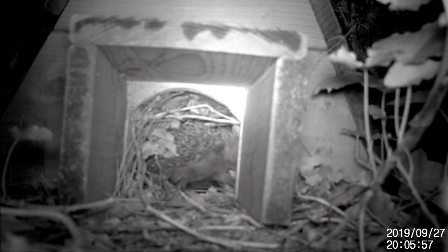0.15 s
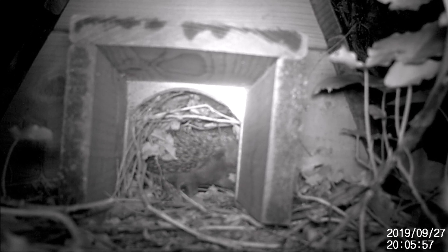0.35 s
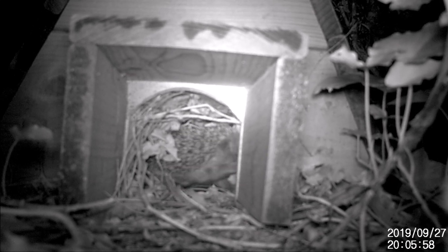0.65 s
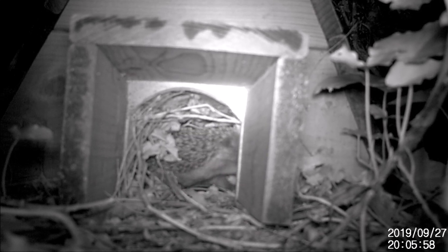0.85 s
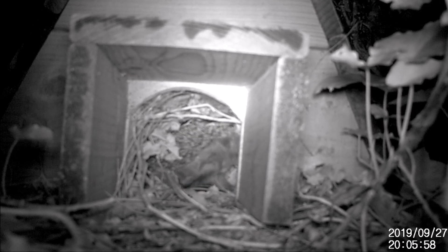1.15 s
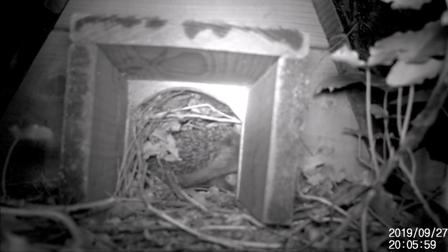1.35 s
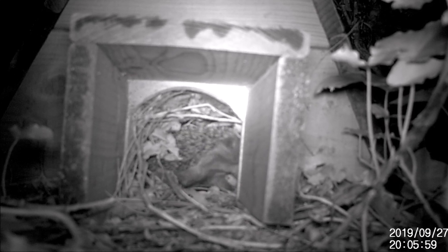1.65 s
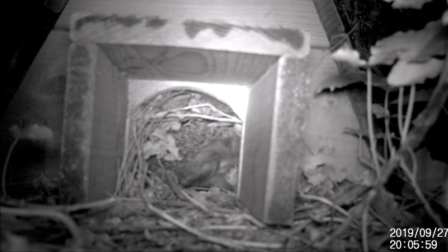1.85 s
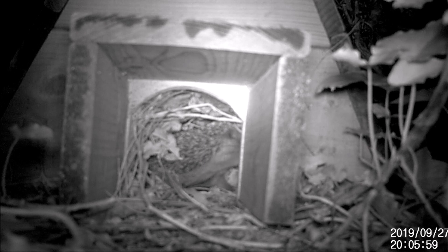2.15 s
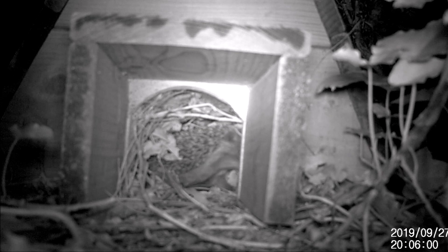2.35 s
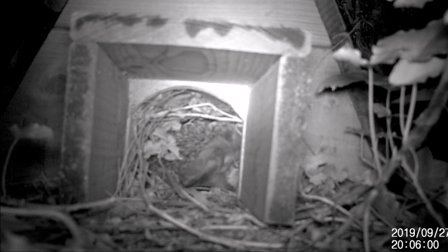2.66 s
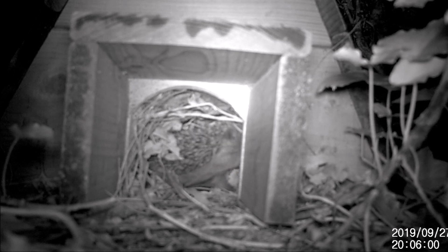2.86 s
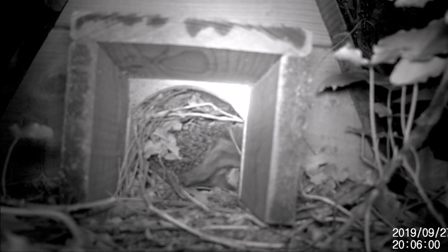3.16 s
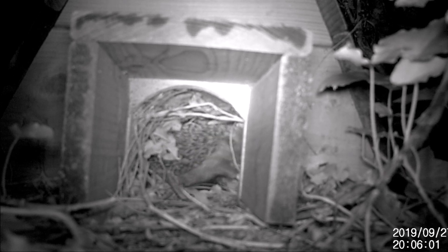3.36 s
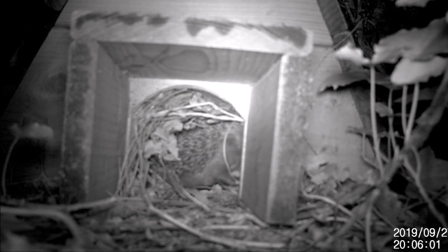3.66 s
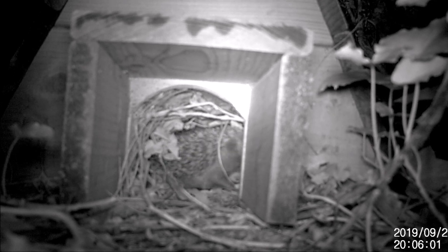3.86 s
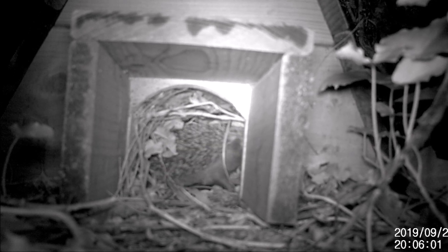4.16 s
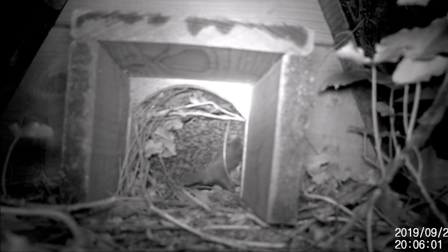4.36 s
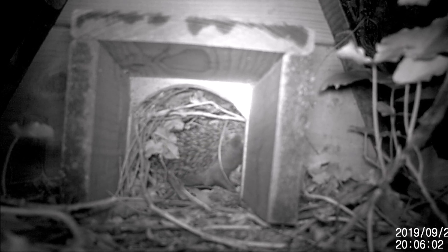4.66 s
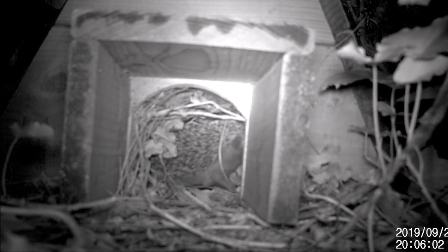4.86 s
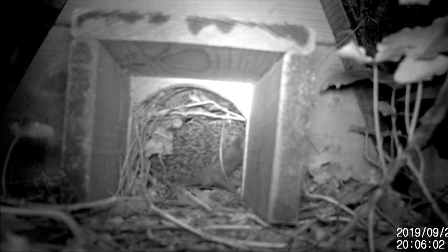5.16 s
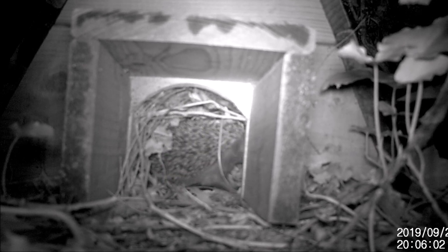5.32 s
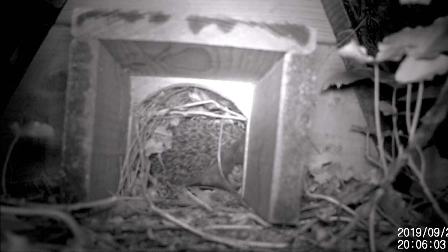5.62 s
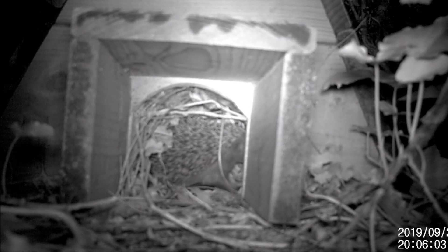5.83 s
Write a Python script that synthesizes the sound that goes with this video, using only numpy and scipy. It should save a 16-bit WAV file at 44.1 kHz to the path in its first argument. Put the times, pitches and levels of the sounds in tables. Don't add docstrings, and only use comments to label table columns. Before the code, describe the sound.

A quiet outdoor night scene beside a nest box, almost mono, with soft steady electronic hiss that brightens slightly and a barely felt low hum. Extremely faint gull cries fall in pitch during the first 2.7 seconds. From about 0.44 to 0.9 s a close small bird-like voice fires quick, high, clean chirps in three clusters, mostly falling, with tiny airy beak ticks. A very soft low whistle follows until 1.1 s, then a thin, very high falling whistle at 1.2-1.44 s. A short raspy buzz comes at 1.5 s, and a longer falling buzz at 1.7-2.0 s smooths into a tone. From 2.45 to about 4.9 s a distant bird flutes low and trills higher, blurred by trees and very quiet. After a pause, sharp close chirps return from 5.45 s, strongest at 5.6-5.95 s, with short echoes. No rustling is heard from the hedgehog.

```python
import sys
import numpy as np
from scipy import signal
from scipy.fft import rfft, irfft, next_fast_len
from scipy.io import wavfile
from scipy.ndimage import uniform_filter1d

SR = 44100
rng = np.random.default_rng(int(sys.argv[2]) if len(sys.argv) > 2 else 0)


def level_to_linear(level):
    exponent = np.asarray(level, float) / 20
    return 10 ** exponent


def log_audio(samples):
    frames = np.atleast_2d(samples).T
    limited = np.clip(frames, -1, 1)
    pcm = np.round(limited * 32767).astype(np.int16)
    wavfile.write(sys.argv[1], SR, pcm)


N = 264159

# delay_s, level_db
WALL_ECHOES = [(0.056, -23), (.012, -21.5)]


def near_bird():
    voice = near_twitter() + near_whistles() + near_buzzes() + beak_ticks()
    garden = level_to_linear(-11) * foliage(t60=0.76, quick_t60=0.039, quick_db=15, onset_s=0.007, top_hz=5140)
    for delay_s, level_db in WALL_ECHOES:
        garden[int(delay_s * SR)] += level_to_linear(level_db)
    wide_tail = foliage(t60=0.36, quick_t60=0.051, quick_db=17.0, onset_s=.001, top_hz=8740)
    side = level_to_linear(-36) * convolve(voice, wide_tail)
    side += level_to_linear(-37.5) * voice
    return voice + convolve(voice, garden) + np.array([side, -side])


# start_s, length_s, from_hz, to_hz, level_db
PLAIN_STROKES = [(.439, 0.011, 4600, 4850, -35), (.469, .006, 3840, 3780, -28.5),
                 (.476, .014, 3767, 3334, -30.5), (.49, 0.026, 4290, 4240, -40),
                 (.602, 0.014, 4400, 4680, -31.5), (.617, 0.0077, 3690, 4150, -33.5),
                 (.624, .011, 3820, 3650, -29), (.635, 0.01, 3440, 3240, -31),
                 (.646, .013, 3200, 2750, -33.5), (.659, .012, 2720, 1715, -63),
                 (.7, 0.013, 3215, 2930, -47.5), (.748, 0.0058, 2980, 3500, -43),
                 (.756, .016, 3190, 2930, -38.5), (.822, .02, 3455, 2900, -33),
                 (.842, .024, 3080, 2840, -38), (.866, .012, 2744, 2760, -47),
                 (5.462, .02, 3520, 3900, -63.5), (5.624, 0.027, 3780, 3985, -38), ]
# start_s, length_s, from_hz, to_hz, level_db
SCOOPED_STROKES = [
    (.457, .008, 4230, 4600, -36.5),
    (.81, 0.011, 3630, 3700, -26.5),
    (5.443, 0.022, 3510, 3490, -56.5),
    (5.777, 0.024, 3612, 3778, -27.5),
    (5.906, 0.029, 3940, 4014, -31),
]
# start_s, length_s, from_hz, to_hz, level_db
DIVING_STROKES = [
    (.508, .007, 3400, 2900, -43),
    (.538, .014, 3615, 3323, -30),
    (.711, .007, 2950, 2560, -40),
    (5.81, 0.0088, 4820, 3550, -33),
    (5.936, .004, 4050, 3560, -27.5),
]
# start_s, length_s, from_hz, to_hz, level_db
PRESSED_STROKES = [
    (5.634, 0.026, 3260, 1524, -63),
    (5.882, 0.016, 3540, 3270, -43.5),
    (5.882, 0.029, 3700, 3670, -44),
    (5.985, .008, 2534, 2900, -54.5),
]


def near_twitter():
    plain = strokes(PLAIN_STROKES, attack=.4, rise_db=2.5, sag_db=10)
    scooped = strokes(SCOOPED_STROKES, attack=.5, rise_db=0.5, sag_db=1.5, scoop=True)
    diving = strokes(DIVING_STROKES, attack=.2, rise_db=-0.5, sag_db=11, dive=True)
    pressed = strokes(PRESSED_STROKES, attack=0.45, rise_db=-2.0, sag_db=4)
    voice = sing(plain, edge_s=0.0012, wobble_hz=29.93, flutter_db=2.5, octave_db=-48)
    voice += sing(scooped, edge_s=0.0014, wobble_hz=15, flutter_db=0.6, octave_db=-44.5)
    voice += sing(diving, edge_s=0.0011, wobble_hz=15, flutter_db=1.1, octave_db=-42.5)
    voice += sing(pressed, edge_s=0.0011, wobble_hz=25, flutter_db=2.5, octave_db=-32)
    return voice


# time_s, pitch_hz, level_db
WHISTLE_PATHS = [
    [(.884, 2245, -52.5), (.9, 2215, -57), (.96, 2222, -55), (1.03, 2193, -55.5), (1.08, 2260, -59),
     (1.103, 2190, -61.5)],
    [(1.201, 6780, -64), (1.208, 7754, -49.5), (1.245, 7584, -43.5), (1.29, 7130, -40), (1.35, 6800, -43),
     (1.41, 6607, -38.5), (1.436, 6464, -41), (1.443, 5387, -63)],
    [(5.668, 1822, -72), (5.682, 2786, -55), (5.6955, 4403, -38), (5.698, 5024, -31.5), (5.706, 5726, -35),
     (5.712, 5940, -34.5), (5.719, 4400, -31.5), (5.725, 2590, -59), (5.731, 1620, -68)],
    [(5.666, 3496, -45), (5.674, 4430, -35.5), (5.679, 5120, -47), (5.688, 6290, -43.5)],
    [(5.794, 3770, -26), (5.798, 4056, -36), (5.8035, 4195, -25), (5.81, 4850, -38.5)],
    [(5.597, 1650, -79), (5.602, 2860, -52.5), (5.607, 3514, -42.5), (5.615, 3590, -35.5),
     (5.629, 3480, -44.5)],
]
WHISTLE_OCTAVES = [-44, -59.5, -39.5, -44, -41, -33]


def near_whistles():
    return sing(WHISTLE_PATHS, edge_s=0.00091, wobble_hz=10, flutter_db=1.17, octave_db=WHISTLE_OCTAVES)


# time_s, pitch_hz, level_db, warble_depth_hz
BUZZ_PATHS = [
    [(1.503, 4860, -35.5, 60), (1.515, 4630, -29.5, 170), (1.555, 4220, -32, 260), (1.595, 4263, -31, 210),
     (1.632, 4420, -32, 150), (1.644, 4440, -40, 122)],
    [(1.713, 4880, -43.5, 73.8), (1.725, 4530, -30.5, 193), (1.745, 4400, -28.5, 221),
     (1.8, 4080, -34, 210), (1.84, 4034, -33.5, 110), (1.87, 3850, -35.5, 35), (1.95, 3668, -40.5, 21.9),
     (2.01, 3780, -41.5, 25), (2.02, 3785, -50, 25)],
    [(0, 8540, -74, 11), (.04, 8580, -67.5, 10), (.09, 8230, -60.5, 10), (.122, 8180, -58, 25),
     (.14, 7830, -68, 260), (.19, 8120, -69.5, 270), (.368, 8070, -74.5, 280)],
    [(.23, 4400, -84, 120), (.355, 4540, -80.5, 270)],
]
# resonance_hz, half_width_hz
BUZZ_THROATS = [(4580, 420), (4520, 340), (7750, 300), (4400, 350)]
BUZZ_RATES = [173.4, 172.4, 195, 189]


def near_buzzes():
    buzzes = [[row + (rate,) for row in note] for note, rate in zip(BUZZ_PATHS, BUZZ_RATES)]
    return sing(buzzes, edge_s=0.00098, wobble_hz=20, flutter_db=0.7, octave_db=-44.0,
                throats=BUZZ_THROATS, ragged=0.36)


# start_s, level_db
BEAK_OPENINGS = [
    (.439, -59),
    (.603, -64),
    (.804, -64),
    (5.436, -79),
    (5.589, -55.5),
]


def beak_ticks():
    out = np.zeros(N)
    t = np.arange(int(0.018 * SR)) / SR
    puff = t / 0.0013 * np.exp(-t / 0.0054)
    for start_s, level_db in BEAK_OPENINGS:
        start = int(start_s * SR)
        out[start:start + len(t)] += level_to_linear(level_db) * puff * rng.standard_normal(len(t))
    mouth = signal.butter(4, (2300, 5800), "band", fs=SR, output="sos")
    return signal.sosfilt(mouth, out)


# start_s, length_s, from_hz, to_hz,
# level_db
FAR_NOTES = [(2.45, .055, 1543, 1940, -76.5), (2.51, 0.12, 1957, 1944, -67.5),
             (2.55, 0.025, 2232, 2098, -65), (2.73, 0.16, 2080, 2000, -73.5),
             (2.93, 0.18, 1962, 1915, -65), (2.96, 0.11, 2361, 2340, -66.5),
             (3.15, .15, 1734, 1700, -73.5), (3.17, 0.2, 2067, 2030, -73.5),
             (3.38, .03, 2444, 2460, -71.5), (3.43, 0.055, 2220, 2090, -62.5),
             (3.48, 0.29, 2095, 2100, -72.5), (3.83, 0.16, 1684, 1665, -75),
             (3.95, 0.17, 2320, 2680, -78), (4.03, 0.035, 1640, 1650, -86),
             (4.09, 0.058, 2005, 2172, -64), (4.14, 0.14, 2190, 2220, -63.5),
             (4.1, .2, 1965, 2050, -71), (4.33, 0.11, 2124, 2207, -70),
             (2.471, .03, 2776, 2757, -84.5), (2.711, 0.038, 2680, 2750, -78),
                  (3.359, 0.17, 3400, 3406, -66.5), (3.401, .08, 3270, 2840, -66),
                  (3.395, 0.037, 4520, 4400, -80), (3.49, 0.023, 4160, 4160, -76),
                  (3.549, 0.11, 2897, 2907, -71.5), (4.146, 0.083, 3020, 3400, -72.5),
                  (4.158, 0.022, 4460, 4400, -78), (4.332, 0.086, 2600, 2550, -76),
                  (4.431, .012, 6180, 5660, -74), (4.443, 0.015, 6730, 5150, -69),
                  (4.466, 0.029, 6100, 3540, -69.5), (4.616, 0.17, 4150, 4260, -76)]
# start_s, length_s, from_hz, to_hz, level_db
FAR_TRILL_NOTES = [
    (2.82, 0.14, 1952, 2140, -69),
    (2.95, .18, 2150, 2125, -71),
    (3.47, 0.14, 2950, 2850, -69),
    (4.43, 0.065, 2860, 2960, -68.5),
    (4.5, .26, 2950, 3170, -73.5),
    (4.5, 0.097, 3850, 3760, -71),
    (4.6, .3, 4000, 4170, -68.5),
]


def far_bird():
    depth_share, trill_hz = 0.1125, 33.16
    flutes = strokes(FAR_NOTES, attack=.15, rise_db=3.5, sag_db=6.5)
    song = sing(flutes, edge_s=0.0091, wobble_hz=30.2, flutter_db=3.0)
    glides = strokes(FAR_TRILL_NOTES, attack=.35, rise_db=4, sag_db=4)
    sweeps = [[row + (depth_share * row[1], trill_hz) for row in note] for note in glides]
    trills = sing(sweeps, edge_s=.03, wobble_hz=110, flutter_db=5.0)
    trees = foliage(t60=1.86, quick_t60=.3, quick_db=1, onset_s=0.021, top_hz=3840)
    tail = convolve(song + trills, trees)
    return level_to_linear(1) * song + level_to_linear(-2.0) * trills + level_to_linear(3.5) * tail


# start_s, length_s, from_hz, to_hz, level_db
GULL_CRIES = [
    (.12, 0.3, 1090, 905, -79.5),
    (.2, 0.075, 1240, 1240, -82),
    (.25, 0.058, 1110, 1043, -74.5),
    (.47, .15, 1240, 1040, -83),
    (.86, 0.17, 1233, 1030, -81),
    (1.4, .05, 1110, 1030, -80),
    (2.07, 0.08, 1280, 1103, -85),
    (2.58, 0.15, 950, 980, -84.5),
]


def gulls():
    cries = strokes(GULL_CRIES, attack=.2, rise_db=3.0, sag_db=6)
    return level_to_linear(1.5) * sing(cries, edge_s=0.018, wobble_hz=3.6, flutter_db=2.5)


# pitch_hz, level_db (per Hz)
HISS_COLOUR = [(35, -29.5), (60, -11), (93, -7.5), (643, -13), (1100, -12.5), (1560, -15.5), (3760, -17),
               (15500, -28.5)]
# time_s, gain_db
TREBLE_CREEP = [
    (0, -5.5),
    (.6, -2),
    (3, -1.75),
    (6, -0.1),
]
# pitch_hz, level_db (rms)
HUM_TONES = [(10, -80.5), (12, -78), (21, -70), (31, -83.5), (33, -77), (42, -85), (51, -88.5), (62, -91.5),
             (124, -97), (150, -94.5), (250, -90.5)]


def camera_noise():
    t = np.arange(N) / SR
    hz, db = np.transpose(HISS_COLOUR)
    f = np.arange(N // 2 + 1) * SR / N + 1
    colour = level_to_linear(np.interp(np.log(f), np.log(hz), db))
    hiss = irfft(rfft(rng.standard_normal(N)) * colour, N)
    treble = signal.sosfilt(signal.butter(1, 1500, "high", fs=SR, output="sos"), hiss)
    hiss += treble * (level_to_linear(np.interp(t, *np.transpose(TREBLE_CREEP))) - 1)
    out = hiss * level_to_linear(-73 + 0.615 * walk(1.5)) / np.std(hiss)
    out += 0.00063
    for pitch_hz, level_db in HUM_TONES:
        drift = 2 * np.pi * rng.random() + 1.0 * walk(1.3)
        out += level_to_linear(level_db) * np.sqrt(2) * np.sin(2 * np.pi * pitch_hz * t + drift)
    low_band = signal.butter(3, (6, 45), "band", fs=SR, output="sos")
    rumble = signal.sosfilt(low_band, rng.standard_normal(N))
    return out + level_to_linear(-79) * rumble / np.std(rumble)


SCOOP_S, SCOOP_FROM, SCOOP_DB = 0.0054, .74, -22.5
DIVE_HZ_PER_S, DIVE_TO_HZ, DIVE_DB_PER_KHZ = 190000, 1800, -20.5


def strokes(rows, attack, rise_db, sag_db, scoop=False, dive=False):
    notes = []
    for start, length, hz0, hz1, db in rows:
        end = start + length
        peak = (start + attack * length, hz0 + attack * (hz1 - hz0), db)
        note = [(start, hz0, db - rise_db), peak, (end, hz1, db - sag_db)]
        if scoop:
            note.insert(0, (start - SCOOP_S, SCOOP_FROM * hz0, db + SCOOP_DB))
        if dive:
            drop = hz1 - DIVE_TO_HZ
            final_db = db - sag_db + DIVE_DB_PER_KHZ * drop / 1000
            note.append((end + drop / DIVE_HZ_PER_S, DIVE_TO_HZ, final_db))
        notes.append(note)
    return notes


def sing(notes, edge_s, wobble_hz, flutter_db, octave_db=-90, throats=None, ragged=0.052):
    out = np.zeros(N)
    wobble, flutter, uneven = walk(150), walk(120), walk(110)
    octaves = np.broadcast_to(octave_db, len(notes))
    for k, note in enumerate(notes):
        s, *columns = np.transpose(note)
        end_s = s[-1] + edge_s
        at = np.arange(max(int(s[0] * SR), 0), min(int(end_s * SR), N))
        t = at / SR
        hz, db, *warble = (np.interp(t, s, c) for c in columns)
        gain = level_to_linear(db + flutter_db * flutter[at]) * np.sqrt(2)
        gain *= np.clip(np.minimum(t - s[0], end_s - t) / edge_s, 0, 1)
        throat_db = 22 / (1 + ((2 * hz - 4600) / 1000) ** 2)
        octave = level_to_linear(octaves[k] - 0.34 * (db + 37.5) + 2.2 * wobble[at] + throat_db)
        octave = octave * (hz < .14 * SR)
        if warble:
            depth, rate = warble
            cycle = 2 * np.pi * np.cumsum(rate * (1 + .2 * uneven[at])) / SR
            swing = depth * (1 + ragged * wobble[at]) * np.sin(cycle)
            if throats:
                centre, width = throats[k]
                beat = 1 + ((hz - centre) / width) ** 2
                beat = beat / (1 + ((hz + swing - centre) / width) ** 2)
                power = uniform_filter1d(beat ** 2, size=512)
                swing -= uniform_filter1d(beat ** 2 * swing, size=512) / power
                beat = beat / np.sqrt(power)
                gain *= beat
                octave = octave * beat * np.clip(depth / 200, .25, 1)
            hz = hz + swing
        phase = 2 * np.pi * np.cumsum(hz + wobble_hz * wobble[at]) / SR
        out[at] += gain * (np.sin(phase) + octave * np.sin(2 * phase))
    return out


def foliage(t60, quick_t60, quick_db, onset_s, top_hz):
    t = np.arange(int(1.5 * SR)) / SR
    noise = rng.standard_normal(len(t))
    dull = signal.sosfilt(signal.butter(2, top_hz, fs=SR, output="sos"), noise)
    slow = np.exp(-np.log(1000) * t / t60)
    h = dull * slow + (noise - dull) * slow ** 1.9
    h += level_to_linear(quick_db) * noise * np.exp(-np.log(1000) * t / quick_t60)
    h *= np.clip(t / onset_s, 0, 1)
    return h / np.sqrt(np.sum(h ** 2))


def walk(rate):
    hold = int(SR / rate)
    steps = np.repeat(rng.standard_normal(N // hold + 1), hold)
    return 1.39 * uniform_filter1d(uniform_filter1d(steps, hold), hold)[:N]


def convolve(x, h):
    size = next_fast_len(N + len(h))
    return irfft(rfft(x, size) * rfft(h, size), size)[:N]


def scene():
    return near_bird() + far_bird() + gulls() + camera_noise()


def roll_off(x):
    return signal.sosfilt(signal.butter(12, 15690, fs=SR, output="sos"), x)


def record(dry):
    mix = dry - 22 * dry ** 3
    return roll_off(mix)


dry = scene()
out = record(dry)
log_audio(out)
```